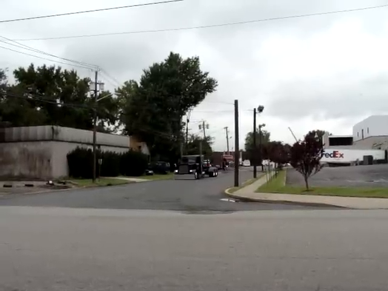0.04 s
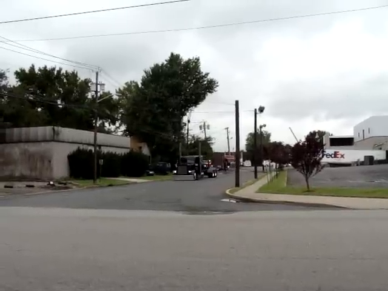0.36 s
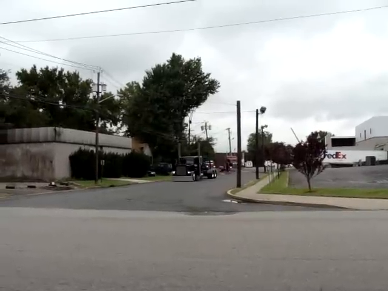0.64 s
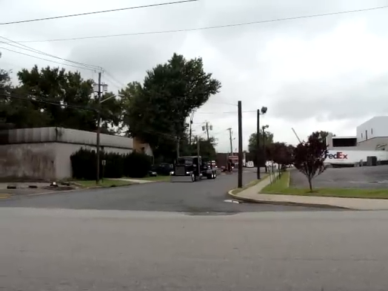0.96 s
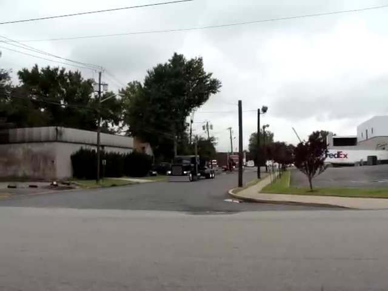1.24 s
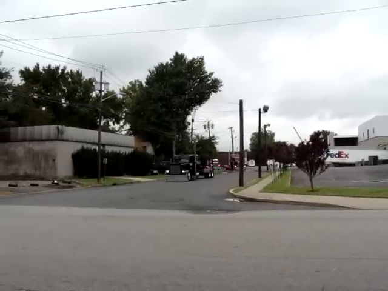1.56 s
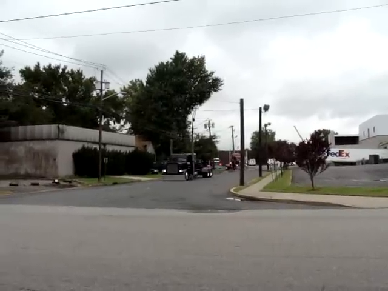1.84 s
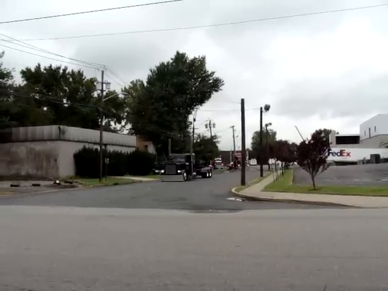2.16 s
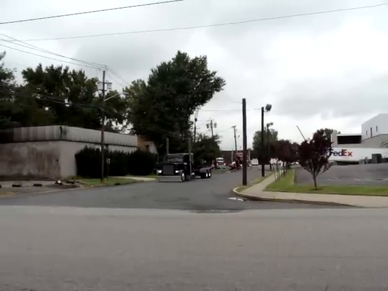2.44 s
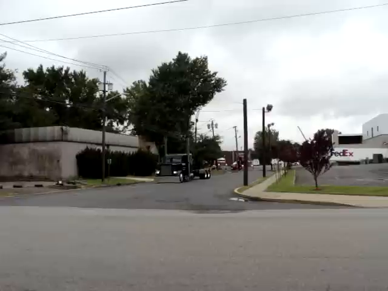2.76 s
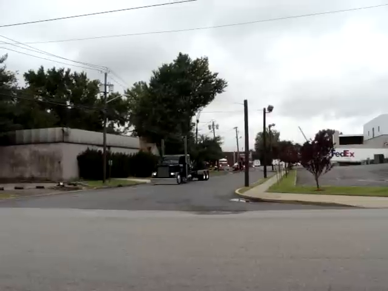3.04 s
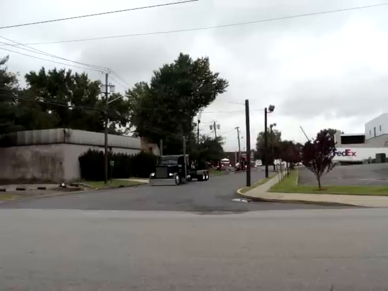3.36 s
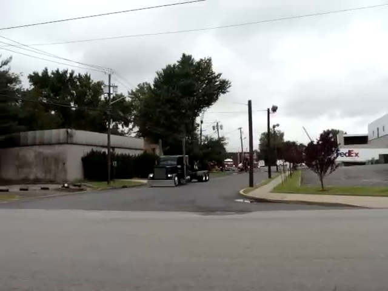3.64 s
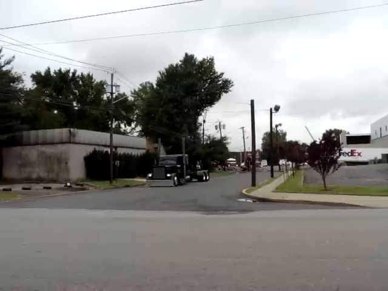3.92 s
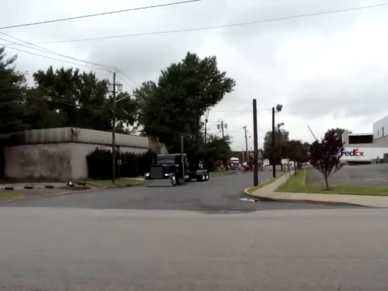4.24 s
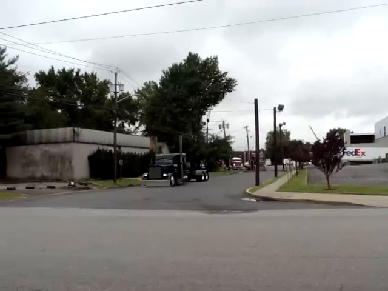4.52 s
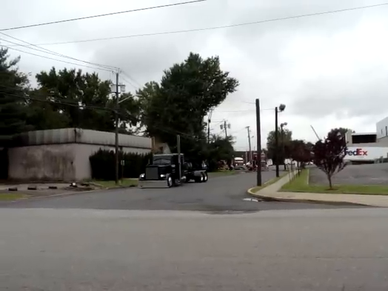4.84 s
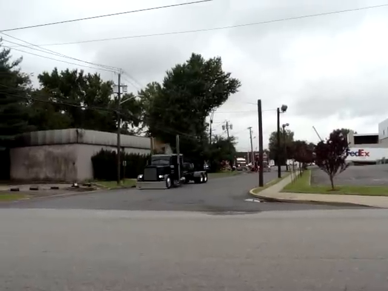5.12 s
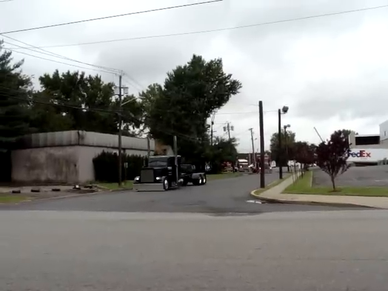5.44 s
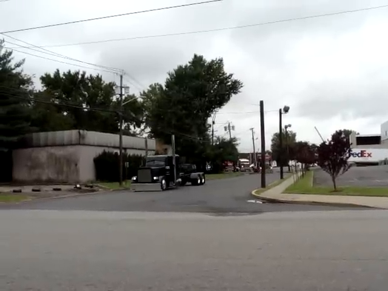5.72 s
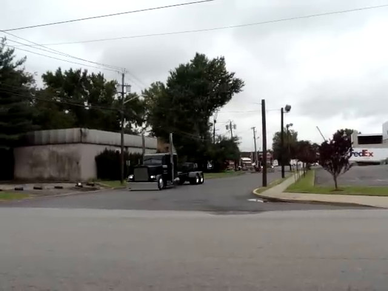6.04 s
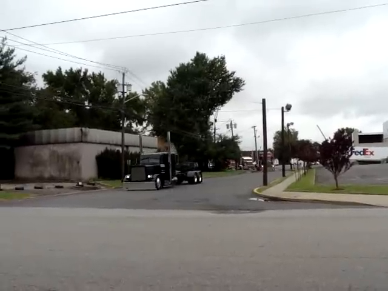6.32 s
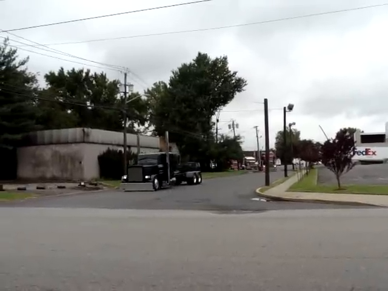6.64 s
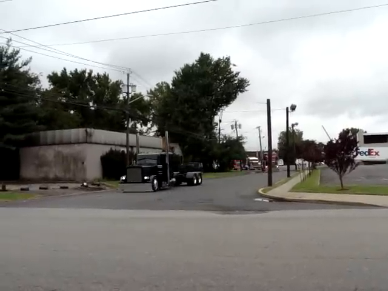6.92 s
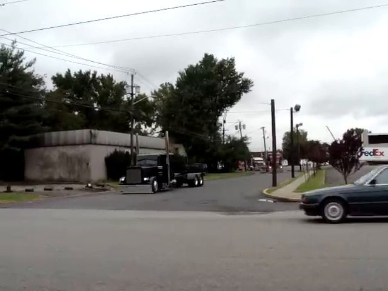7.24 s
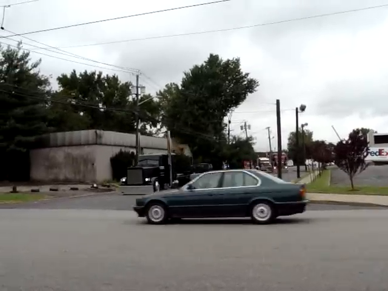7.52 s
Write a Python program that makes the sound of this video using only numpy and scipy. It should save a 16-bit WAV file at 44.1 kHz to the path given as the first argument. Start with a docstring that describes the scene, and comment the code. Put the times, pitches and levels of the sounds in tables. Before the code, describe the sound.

Outdoors on a street, against low rumble and distant traffic, a nearby diesel idles throughout, knocking, rattling and chugging while its belt chirps thinly. A truck further away drones and drops in pitch as it slows, and faint squeaks come and go. Halfway through, a low hum briefly rises. Finally the roar and hiss of a car's tyres build and pass several metres from the microphone.

```python
"""A big diesel idles on a street, close to the microphone. Its exhaust throbs, uneven knocks, the same
on every cycle, ring the block and covers, and a belt chirps. Further off a second truck rolls slowly up,
its drone sinking as it slows, with faint high squeaks; a low hum swells and fades midway. Towards the
end a car's tyres roar past on rough asphalt, about 8.5 m away. Behind it all: rumble and far traffic."""
import sys
import numpy as np
from scipy import signal
from scipy.fft import rfft, irfft
from scipy.io import wavfile
from scipy.ndimage import uniform_filter1d

SR = 44100
rng = np.random.default_rng(int(sys.argv[2]) if len(sys.argv) > 2 else 0)


def store_wav(level_fs):
    """Save 16-bit WAV to argv[1]."""
    pcm = np.round(np.clip(np.atleast_2d(level_fs), -1, 1) * 32767)
    wavfile.write(sys.argv[1], SR, pcm.T.astype(np.int16))


N = 338688
T = np.arange(N) / SR
IDLE_HZ = 6.883  # four-stroke cycles per second of the near diesel


def undb(db):
    """Decibels to gain."""
    return 10 ** (np.asarray(db) / 20)


def level(x, db):
    """Scale to an rms level."""
    return x * undb(db) / np.sqrt(np.mean(x ** 2))


def walk(rate):
    """Random levels held 1 / rate s and smoothed twice; rms 1."""
    hold = max(int(SR / rate), 1)
    held = np.repeat(rng.standard_normal(N // hold + 1), hold)
    return level(uniform_filter1d(uniform_filter1d(held, hold), hold)[:N], 0)


def colour(x, spectrum):
    """Filter by (f/Hz, level/dB) points; rms 1."""
    hz, db = np.transpose(spectrum)
    f = np.maximum(np.fft.rfftfreq(N, 1 / SR), 1)
    response = undb(np.interp(np.log(f), np.log(hz), db))
    return level(irfft(rfft(x) * response, N), 0)


def noise(spectrum):
    """Noise with the given spectrum; rms 1."""
    return colour(rng.standard_normal(N), spectrum)


def ring(x, modes):
    """Drive resonances (f/Hz, width/Hz, level/dB), each applied twice for steep skirts; rms 1."""
    f = np.maximum(np.fft.rfftfreq(N, 1 / SR), 1)
    response = sum(undb(db) / (1 + .5j * (f * f - hz * hz) / (f * width)) ** 2 for hz, width, db in modes)
    return level(irfft(rfft(x) * response, N), 0)


def rasp(hz, jitter_hz):
    """A rough tone: its pitch jumps about as the contact sticks and slips."""
    return np.sqrt(2) * np.sin(2 * np.pi * np.cumsum(hz + jitter_hz * walk(900)) / SR)


# spectrum of the street all around the microphone: f/Hz, level/dB
STREET_RUMBLE = [(20, -35), (50, -5), (70, -2), (100, -2), (160, 1), (200, -6.5), (245, 1.5), (300, -9.5),
                 (600, -7), (2000, -42)]

def street_rumble():
    """The street's low, wavering rumble."""
    return undb(-31.5 + 1.8 * walk(8.7)) * noise(STREET_RUMBLE)


# spectrum of tread on asphalt, for far traffic and the passing car: f/Hz, level/dB
TREAD_ROAR = [(60, -21), (200, -14), (370, -7), (550, 1.5), (850, 3.5), (1300, 2), (1750, 0), (2500, -6),
              (4000, -11.5), (7000, -30), (10000, -40.5)]

def far_traffic():
    """The steady roar of tyres on roads further off."""
    return noise(TREAD_ROAR) * undb(-30 + 0.3 * walk(18))


def hum(start_s=3.25, attack_s=0.57, hz=154.8, sag_hz_per_s=5.04, fade_db_per_s=15):
    """One low tone that swells, sags in pitch and fades."""
    age = np.maximum(T - start_s, 0)
    fade_db = fade_db_per_s * np.maximum(age - attack_s, 0)
    envelope = np.minimum(age / attack_s, 1) * undb(-27.5 - fade_db)
    return np.sqrt(2) * envelope * np.sin(2 * np.pi * np.cumsum(hz - sag_hz_per_s * age) / SR)


# thin squeaks, faint at the microphone: t/s, length/s, first f/Hz, last f/Hz, level/dB
HIGH_SQUEAKS = [(.28, 0.33, 8660, 9300, -57), (0.726, 0.2, 8240, 8400, -54), (1.861, 0.17, 8200, 7750, -53),
                (2.02, 0.13, 7940, 8340, -49), (3.14, 0.16, 8650, 8800, -52), (3.7, .3, 8700, 9050, -53),
                (4.517, .25, 8400, 8800, -53), (4.66, 0.22, 9100, 8840, -48), (5.55, .27, 8700, 8850, -51)]

def squeaks():
    """Gritty tones that bend to their final pitch."""
    out = np.zeros(N)
    for start, length, from_hz, to_hz, db in HIGH_SQUEAKS:
        along = np.clip((T - start) / length, 0, 1)
        hz = to_hz + (from_hz - to_hz) * (1 - along) ** 2
        envelope = 2 * np.sqrt(along * (1 - along))
        out += undb(db) * envelope * rasp(hz, jitter_hz=138.4)
    return out * undb(3.1 * walk(55))


# a harmonic of the far truck's exhaust stack, as loud as it arrives at each pitch: f/Hz, level/dB
EXHAUST_STACK = [(35, -50), (44, -47.5), (70, -42.5), (86, -32.5), (102, -45.5), (110, -38), (116, -30.5),
                 (123, -33), (128, -28)]

def rolling_truck(start_hz=44.62, idle_hz=34.6, ease_hz_per_s=.6, throttle_off_s=3.1, drop_hz_per_s=1.8):
    """Only low firing harmonics carry this far; as the truck slows they leave the stack's resonances."""
    coasting_s = np.maximum(T - throttle_off_s, 0)
    firing_hz = np.maximum(start_hz - ease_hz_per_s * T - drop_hz_per_s * coasting_s, idle_hz)
    phase = 2 * np.pi * np.cumsum(firing_hz * (1 + 0.0023 * walk(7.77))) / SR
    stack_hz, stack_db = np.transpose(EXHAUST_STACK)
    drone = sum(undb(np.interp(k * firing_hz, stack_hz, stack_db)) * np.sin(k * phase) for k in (1, 2, 3))
    unsteady_db = np.interp(firing_hz, [40, 43.5], [2.6, .8])  # wavers more as it nears idle
    return np.sqrt(2) * drone * undb(unsteady_db * walk(14))


# tyre spectra, the treble beamed up the street and the hiss abreast of the microphone: f/Hz, level/dB
TREAD_TREBLE = [(400, -30), (1000, -12), (1700, 4.5), (2300, 1), (3200, -10), (6000, -28.5)]
SIDE_HISS = [(60, -18), (180, -17), (350, -8), (470, 1.5), (680, 2), (850, 5), (1050, 0.5), (1300, 1),
             (2000, -5.5), (3000, -6.5), (4500, -16), (6500, -18), (10000, -30.5)]

def passing_car(abreast_s=7.51, speed_m_s=14.1, lane_m=8.54):
    """The wedge between tyre and road beams the roar ahead; abreast, the sideways hiss takes over."""
    ahead_m = speed_m_s * (abreast_s - T)
    nearness = lane_m / np.hypot(ahead_m, lane_m)
    angle_deg = np.degrees(np.arctan2(lane_m, ahead_m))  # from the car's heading to the microphone
    wide_beam = np.exp(-((angle_deg - 31.3) / 21.8) ** 2)
    narrow_beam = np.exp(-((angle_deg - 35.8) / 5.8) ** 2)
    sideways = np.sin(np.radians(angle_deg)) ** 2
    roar = noise(TREAD_ROAR) * undb(-24 + 9 * wide_beam + 0.21 * walk(11))
    treble = noise(TREAD_TREBLE) * undb(-23) * narrow_beam
    hiss = noise(SIDE_HISS) * undb(-19.5 + 0.49 * walk(25)) * sideways
    return nearness * (roar + treble + hiss)


def offset(cycles, place):
    """Signed distance, in cycles, from a place in the engine's cycle."""
    return (cycles - place + .5) % 1 - .5


# the near diesel's belt: place/cycle, length/s, f/Hz, glide/Hz, relative level/dB
BELT_CHIRPS = [(0.077, .02, 4500, 130, -2), (0.168, 0.013, 4533, 33, -2.5), (.19, .024, 4296, -59, -6),
               (0.258, .014, 4500, -62, -1), (.39, 0.029, 4360, -43.5, -3.5),
               (.425, .018, 4530, 39.5, -5.5), (0.532, .022, 4540, 82, -4), (0.714, .028, 4500, 0, -7.5),
               (0.903, 0.024, 4490, 41.5, -6)]

def belt(cycles, arch_hz=49.3, scatter_db=3):
    """Rasping chirps, probably the belt slipping, return every cycle; each arches in pitch."""
    out = np.zeros(N)
    for place, length_s, hz, glide_hz, db in BELT_CHIRPS:
        along = np.clip(offset(cycles, place) / IDLE_HZ / length_s, -.5, .5)
        pitch = hz + glide_hz * along - arch_hz * (2 * along) ** 2
        envelope = np.sqrt(np.abs(np.cos(np.pi * along)))
        out += envelope * undb(db + scatter_db * walk(14)) * rasp(pitch, jitter_hz=58.1)
    return level(out, -38.5)


def rattling(cycles, places, knocks_db, rise_s, decay_s, repeat, sustain, scatter_db):
    """A rounded noisy burst after each knock; a share of its grain returns every cycle, the rest is new."""
    latest = np.searchsorted(places, cycles % 1) - 1
    age = (cycles - places[latest]) % 1 / IDLE_HZ
    force = undb(knocks_db[latest] + scatter_db * walk(80))
    burst = uniform_filter1d(force * (np.exp(-age / decay_s) + sustain), int(rise_s * SR))
    period = int(SR / IDLE_HZ)
    phases = 2 * np.pi * rng.random(N // 2)[:period // 2 + 1]
    flat_noise = level(irfft(np.exp(1j * phases), period), 0)
    grain = np.interp(cycles % 1 * period, np.arange(period), flat_noise)
    return burst * (np.sqrt(repeat) * grain + np.sqrt(1 - repeat) * rng.standard_normal(N))


def blows(cycles, places, knocks_db, scatter_db, jitter_s, contact_s=.0001):
    """A sharp push at each knock, slightly different in force and timing every time."""
    place = (cycles + IDLE_HZ * jitter_s * walk(60)) % 1
    nearest = np.searchsorted((places[1:] + places[:-1]) / 2, place)
    off_s = (place - places[nearest]) / IDLE_HZ
    return np.exp(-(off_s / contact_s) ** 2) * undb(knocks_db[nearest] + scatter_db * walk(60))


# the near diesel's knocks: place/cycle, then relative level/dB in cover, block, plate and rattle
CYCLE_KNOCKS = [(.035, -3, 0, -6, -1), (.098, -11, -15, -6, -1.5), (.213, -7, -7, -5, -1.5),
                (.237, -4, -10, -2, -2), (.341, -4, -17, 3, -1), (.387, -8, 4, -9, 0),
                (.452, -9, 0, -12, -1), (.513, -15, -5, -2, -.5), (.565, -2, -7, -8, -1.5),
                (.664, -12, -9, -8, -.5), (.737, -9, 0, -7, -2), (.847, -5, -5, -5, -1.5),
                (.918, -8, -9, -11, -2.5)]
# resonances of its covers, block, thin plate, loose parts and valve gear: f/Hz, width/Hz, level/dB
COVER_MODES = [(746.6, 30, 3.5), (765, 27, -3)]
BLOCK_MODES = [(1062, 56, 1), (1142, 34, -1)]
PLATE_MODES = [(1234, 50, -5.5), (1328, 28, -0.5), (1437, 130, -3.5)]
LOOSE_MODES = [(354.4, 27, -1), (475, 45, -5), (2058, 88, 1), (2838, 97, -5.5)]
VALVE_MODES = [(5260, 200, 0.5), (5880, 300, 1), (6700, 300, -3)]
# spectrum of the whole engine's rattle from close by: f/Hz, level/dB
ENGINE_RATTLE = [(150, -9), (290, 1.5), (410, -0.5), (500, 0.5), (620, -2), (760, 0.5), (900, -3.5),
                 (1080, 2.5), (1450, -2.5), (1750, -6), (2300, -1), (2900, -2), (3400, -8.5), (4100, -7.5),
                 (4950, -12), (5250, -12.5), (5900, -13), (6250, -17.5), (6750, -17), (7600, -22.5),
                 (10000, -27)]

def clatter(cycles):
    """Combustion and valve knocks ring the metal, tick in the valve gear and set the engine rattling."""
    places, cover_db, block_db, plate_db, rattle_db = np.transpose(CYCLE_KNOCKS)
    rattle = rattling(cycles, places, rattle_db,
                      rise_s=0.0035, decay_s=0.008, repeat=0.55, sustain=1.75, scatter_db=0.78)
    ticks = rattling(cycles, places, rattle_db,
                     rise_s=0.001, decay_s=0.005, repeat=0.85, sustain=0.05, scatter_db=2.5)
    cover = ring(blows(cycles, places, cover_db, scatter_db=0.5, jitter_s=0.00003), COVER_MODES)
    block = ring(blows(cycles, places, block_db, scatter_db=1.3, jitter_s=0.00006), BLOCK_MODES)
    plate = ring(blows(cycles, places, plate_db, scatter_db=1.7, jitter_s=0.00005), PLATE_MODES)
    rattles = undb(-1) * colour(rattle, ENGINE_RATTLE) + undb(-15.5) * ring(rattle, LOOSE_MODES)
    knocks = undb(-5) * cover + undb(-7) * block + undb(-10.5) * plate
    return rattles + knocks + undb(-25) * ring(ticks, VALVE_MODES)


# strong puffs from the near exhaust: place/cycle, relative level/dB
EXHAUST_PUFFS = [(.246, -15.5), (.487, -7.2), (.579, -6.3), (.915, -3.8)]
# the boom of its pipe: f/Hz, width/Hz, level/dB
PIPE_MODES = [(231, 17.5, 0)]
# exhaust and body tones: multiple of the cycle rate, relative level/dB
ENGINE_ORDERS = [(6, -46), (12, -40.5), (14, -42), (15, -47), (16, -44.5), (20, -43.5), (21, -46),
                 (22, -45), (24, -45), (27, -39.5), (45, -48), (51, -44), (65, -47), (70, -45), (72, -47.5),
                 (78, -44.5), (96, -51), (192, -50)]

def exhaust(cycles):
    """Unequal puffs boom in the pipe, a chug twice a cycle, over tones on multiples of the cycle rate."""
    puffs = sum(undb(db) * np.exp(-(offset(cycles, place) / .005) ** 2) for place, db in EXHAUST_PUFFS)
    boom = undb(-29.5) * ring(puffs * undb(0.26 * walk(21)), PIPE_MODES)
    starts = rng.random(len(ENGINE_ORDERS))
    tones = sum(undb(db) * np.sin(2 * np.pi * (order * cycles + start) + 0.052 * walk(5))
                for (order, db), start in zip(ENGINE_ORDERS, starts))
    return boom + np.sqrt(2) * tones * undb(.5 * walk(15))


def idling_diesel(cycles):
    """Exhaust and clatter from close by; moving air makes the clatter waver a little."""
    return undb(1.96) * exhaust(cycles) + undb(-26 + 0.51 * walk(7.6)) * clatter(cycles)


# slow swell of the diesel and the rumble at the microphone: t/s, level/dB
SLOW_SWELL = [(0, -2), (2, -0.5), (4.4, 0.48), (7.68, 0.3)]

def scene():
    """One microphone on the street: the diesel close by, the truck further off, the car going past."""
    cycles = IDLE_HZ * T + 0.002367 * walk(2.5)  # the crank runs ahead or behind as the governor hunts
    swell = undb(np.interp(T, *np.transpose(SLOW_SWELL)))
    near = swell * (idling_diesel(cycles) + street_rumble()) + belt(cycles)
    return (near + far_traffic() + rolling_truck() + hum() + squeaks() + passing_car())[None]


def record(dry, bottom_hz=32, top_hz=10100):
    """The small microphone drops the deepest bass; the top is cut steeply."""
    low_cut = signal.butter(4, bottom_hz, "highpass", fs=SR, output="sos")
    high_cut = signal.ellip(12, .2, 95, top_hz, fs=SR, output="sos")
    return signal.sosfilt(high_cut, signal.sosfilt(low_cut, dry))


dry = scene()
out = record(dry)
store_wav(out)
```